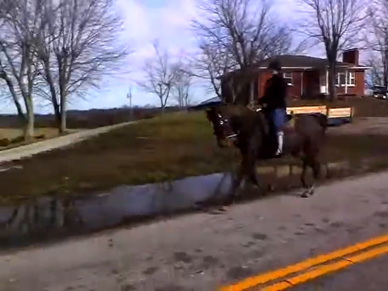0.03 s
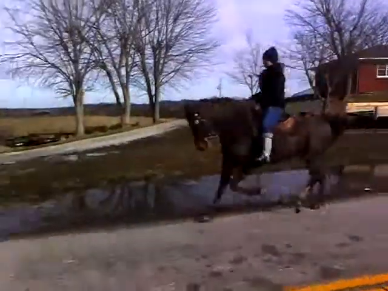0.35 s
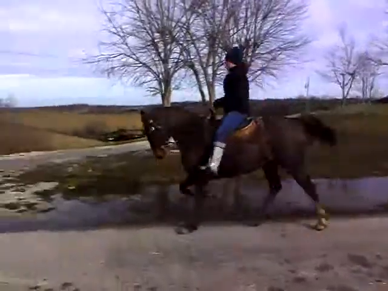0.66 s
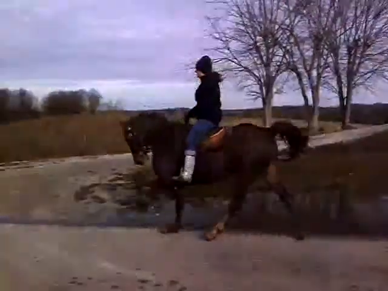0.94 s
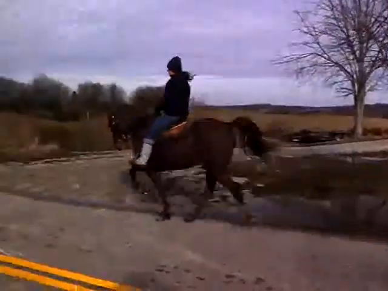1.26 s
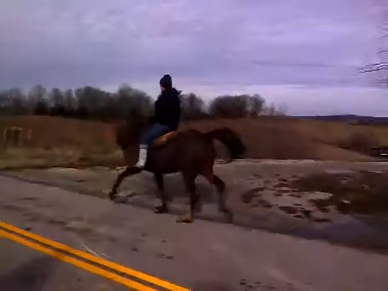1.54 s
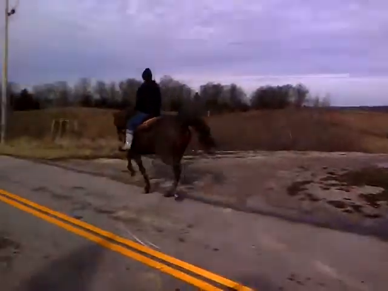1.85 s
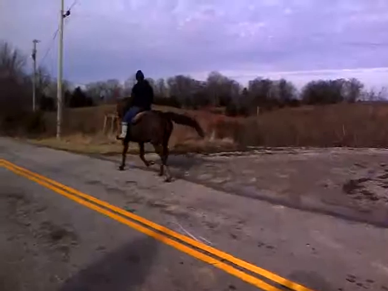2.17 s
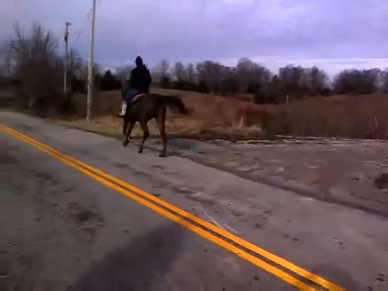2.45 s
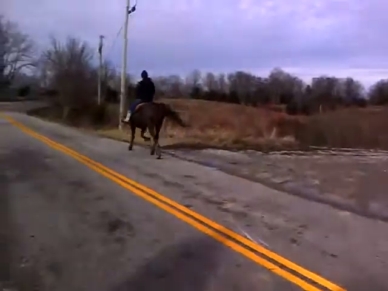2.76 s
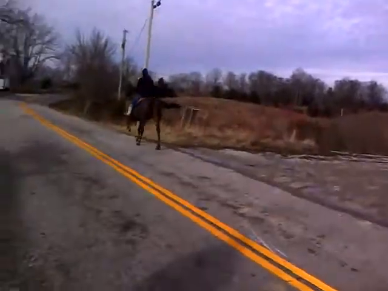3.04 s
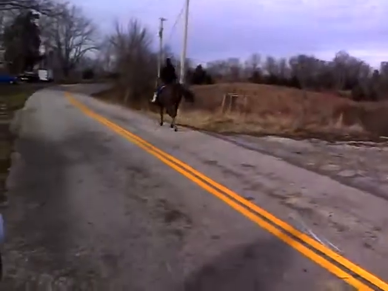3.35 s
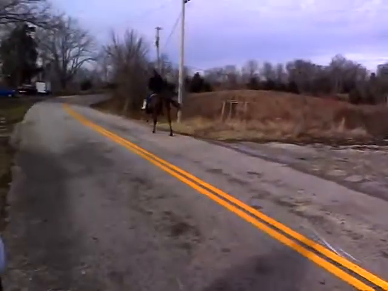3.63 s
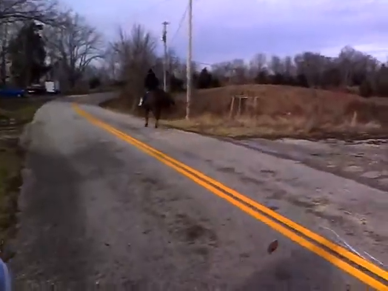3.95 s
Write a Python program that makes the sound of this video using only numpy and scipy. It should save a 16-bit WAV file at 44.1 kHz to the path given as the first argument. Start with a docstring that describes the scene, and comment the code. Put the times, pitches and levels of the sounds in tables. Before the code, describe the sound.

Quick, hollow hoofbeats of a shod horse on pavement, under rumbling gusts of wind.

```python
"""Quick, hollow clip-clops pass close by and move away, under rumbling gusts of wind.
They come from a shod horse on a paved road: each hoof rings with a clop, its steel shoe
clinks, the pavement gives a sharp crack and grit crunches underfoot.
Swirls of air (eddies) buffet the microphone and overload it. A faint hiss lies behind it all."""
import sys
import numpy as np
from scipy import signal
from scipy.fft import rfft, irfft
from scipy.io import wavfile
from scipy.ndimage import map_coordinates

SR = 44100
rng = np.random.default_rng(int(sys.argv[2]) if len(sys.argv) > 2 else 0)


def bounce(signal):
    """Save signal as a 16-bit WAV file at the path given by the first command-line argument."""
    frames = np.transpose(np.atleast_2d(signal))
    limited = np.clip(frames, -1, 1)
    pcm = np.round(limited * 32767).astype(np.int16)
    wavfile.write(sys.argv[1], SR, pcm)


N = 176400
T = np.arange(N) / SR
HIT_T = np.arange(SR // 5) / SR  # seconds since a hit


def from_db(db):
    """Turn decibels into a number to multiply by."""
    return 10 ** (np.asarray(db) / 20)


def unit_power(x):
    """Scale a signal to an average power of 1."""
    return x / np.sqrt(np.mean(x ** 2) + 1e-20)


def coloured(x, spectrum):
    """Shape a signal's tone with (frequency [Hz], level [dB]) points; the result has power 1."""
    hz, db = np.transpose(spectrum)
    bin_hz = np.maximum(np.arange(N // 2 + 1) * SR / N, 1)
    gain = from_db(np.interp(np.log(bin_hz), np.log(hz), db))
    return unit_power(irfft(rfft(x) * gain, N))


def noise(spectrum):
    """Steady noise with the given tone."""
    return coloured(rng.standard_normal(N), spectrum)


def drift(hz):
    """A smooth random wobble, about 1 in size; a higher hz wobbles faster."""
    r = np.exp(-2 * np.pi * hz / SR)
    return unit_power(signal.lfilter([1], [1, -2 * r, r * r], rng.standard_normal(N + SR))[SR:])


def add(out, start_s, sound):
    """Mix a short sound in at the given time."""
    i = max(int(start_s * SR), 0)
    out[i:i + len(sound)] += sound[:max(N - i, 0)]


def hiss():
    """A faint, steady background: a low murmur with a thin hiss on top."""
    # background tone: (frequency [Hz], level [dB])
    tone = [(200, 37.5), (1000, -11), (2000, -30), (3500, 1), (5500, 8), (7600, 22.5), (8600, 9),
            (9800, -5.5), (16000, -18)]
    return from_db(-49) * noise(tone)


def ticks(strength_db):
    """Tiny eddies tap the microphone in little puffs, harder as the wind rises, up to a limit."""
    # tone of a tap: (frequency [Hz], level [dB])
    tone = [(100, -14), (350, -2), (700, 0), (1200, -6), (2000, -20), (3200, -38), (8000, -70)]
    sizes = from_db(9.5 * np.clip(rng.standard_normal(N), -2, 2)) * rng.choice([-1, 1], N)
    taps_per_s = 97 * from_db(5.5 * drift(hz=30))
    taps = coloured(sizes * (rng.random(N) < taps_per_s / SR), tone)
    return taps * from_db(-4 + 1.424 * np.minimum(strength_db, -10.5))


def wind():
    """A lumpy rumble, taps, and eddies that sound louder and higher when the air swirls faster."""
    # wind at the microphone: (time [s], strength [dB])
    gusts = [(0, -8.5), (.1, -6), (.32, -1), (.39, -8), (.46, -3), (.51, -11.5), (.56, -4), (.61, -13),
             (.65, -21), (.69, -29), (.75, -27.5), (.79, -40.5), (.84, -13), (.93, -9.5), (.96, -14),
             (1.03, -4), (1.13, -3), (1.16, -26), (1.205, -25.5), (1.24, -7.5), (1.275, -19), (1.33, -30.5),
             (1.37, -9), (1.41, -26), (1.45, -23), (1.52, -27), (1.62, -27), (1.72, -20.5), (1.79, -26.5),
             (1.86, -25.5), (1.93, -21), (2.03, -25.5), (2.16, -23.5), (2.27, -21), (2.35, -19.5),
             (2.41, -13), (2.475, -27.5), (2.56, -14.5), (2.635, -3.5), (2.70, -3), (2.755, -25),
             (2.83, -18), (2.87, -34), (2.94, -26), (3.01, -29), (3.1, -30.5), (3.17, -20), (3.2, -33),
             (3.23, -20), (3.31, -22.5), (3.40, -18), (3.45, -25), (3.55, -23), (3.6, -28.5), (3.68, -25),
             (3.78, -23.5), (3.83, -32.5), (3.87, -23.5), (3.9, -35.5), (3.94, -24), (4, -24)]
    # tone of the rumble: (frequency [Hz], level [dB])
    rumble_tone = [(20, -14.5), (40, -14.5), (100, -0.5), (170, 1), (330, -2), (600, -11.5), (1000, -48),
                   (1600, -39.5), (3000, -55.5), (8000, -81)]
    # tone of the eddies in a full gust: (frequency [Hz], level [dB])
    flutter_tone = [(60, -31), (150, -12.5), (300, 0), (520, -1.5), (850, -6), (1250, -9), (2000, -17.5),
                    (3500, -29.5), (8000, -54)]
    strength_db = np.interp(T, *np.transpose(gusts)) + 1.82 * drift(hz=65.4)
    swirl = 2 * np.tanh(drift(hz=200) / 2)
    speed = from_db(0.13 * strength_db + 2.5 * swirl)
    # running through the noise faster raises its pitch
    eddies = map_coordinates(noise(flutter_tone), [np.cumsum(speed)], order=3, mode="wrap")
    flutter = from_db(-3.5 + 1.1 * strength_db + 4.5 * swirl) * eddies
    rumble = from_db(-7.5 + 0.74 * strength_db) * noise(rumble_tone)
    return rumble + flutter + ticks(strength_db)


def buffets():
    """Single eddies slap the microphone with brief, ragged pressure swings; small ones swing faster."""
    # slaps of air: (time [s], level [dB], half length [s], centre pitch [Hz])
    slaps = [(0.639, -5, 0.00094, 670), (0.662, -3, 0.0032, 164), (0.668, -5, 0.0019, 700),
             (0.72, 2, 0.0016, 440), (.741, -7, 0.0035, 590), (0.816, -13, 0.0011, 686),
             (0.889, -2.5, 0.002, 592), (0.971, -2.5, 0.0015, 616), (1.178, 10, 0.00067, 600),
             (1.186, 8, 0.0017, 655), (1.239, 6, 0.0014, 450), (1.256, 5, 0.0017, 558),
             (1.286, -6.5, 0.0029, 378), (1.303, -4, 0.0043, 326), (1.368, 4, 0.0012, 550),
             (1.377, 8.5, 0.0013, 594), (1.392, 10, 0.00069, 446), (1.4396, 7.5, 0.00071, 545),
             (1.479, -1.5, 0.0023, 203), (2.253, -13, 0.001, 1040), (2.265, -6.5, 0.0015, 580),
             (2.375, -2.5, 0.00063, 695), (2.4, 13, 0.001, 463), (2.422, 1, 0.00055, 620),
             (2.508, 0, 0.001, 736), (2.553, 3.5, 0.002, 466), (2.573, 0.5, 0.00068, 630),
             (2.592, 5, 0.00067, 590), (2.734, 2, 0.002, 530), (2.774, -3, 0.0011, 610),
             (2.803, -2.5, 0.0019, 455), (2.827, -2.5, 0.0015, 420), (3.059, -6, 0.00088, 656),
             (3.223, -14.5, 0.0015, 485), (3.35, -6, 0.0015, 434), (3.416, -9, 0.0015, 480)]
    # tone of a slap centred on centre_hz: (frequency [Hz], level [dB])
    tone = [(60, -9.5), (200, 2), (500, 0), (900, -2), (1500, -15), (3000, -28.5), (8000, -51)]
    centre_hz, evenness = 500, 0.73
    swings = signal.hilbert(noise(tone))  # its abs() is the size of the swings
    ragged = unit_power(swings.real / (np.abs(swings) + 0.076) ** evenness) / np.sqrt(2)
    out = np.zeros(N)
    t = HIT_T[:SR // 20] - 1 / 40  # seconds from the middle of a slap
    for time_s, db, half_s, hz in slaps:
        pressure = np.interp(time_s + t * hz / centre_hz, T, ragged)
        swell = np.exp(-0.5 * (t / half_s) ** 2)
        add(out, time_s + t[0], from_db(db) * swell * pressure)
    return out


def roadside_echo(sound):
    """The road and its edges scatter back a faint, short echo."""
    echo_db, fade_s, rise_s = -25, 0.32, 0.01
    t = T[:SR // 2]
    tail = rng.standard_normal(len(t)) * from_db(-60 * t / fade_s) * (1 - np.exp(-t / rise_s))
    return from_db(echo_db) * signal.fftconvolve(sound, tail / np.linalg.norm(tail))[:N]


def ring(hz, fade_s):
    """One tone of a struck object, dying away by 60 dB in fade_s."""
    return np.sin(2 * np.pi * hz * HIT_T) * from_db(-60 * HIT_T / fade_s)


def onset(rise_s):
    """A quick rise from 0 to 1 that softens the start of a hit."""
    return 1 - np.exp(-HIT_T / rise_s)


def shoe_rub(hz):
    """Grit rubs the steel shoe and keeps it singing: noise narrowed to a restless ring."""
    width_hz = 330
    r = np.exp(-np.pi * width_hz / SR)
    feedback = [1, -2 * r * np.cos(2 * np.pi * hz / SR), r * r]
    return unit_power(signal.lfilter([1, 0, -1], feedback, rng.standard_normal(len(HIT_T))))


def hooves():
    """Each step rings the hoof and its shoe, cracks on the pavement and grinds some grit."""
    # toe taps and full landings: (time [s], clop level [dB], clop pitch [Hz], clink level [dB],
    # clink pitch [Hz], crack level [dB], grit level [dB], grit fade [s])
    steps = [(0.018, -6, 930, -7, 8220, -17, -28.5, 0.014), (0.198, -10, 980, -5, 6920, -13, -27.5, 0.018),
             (0.411, -18, 1010, -17.5, 6910, -29, -25, 0.022),
             (.537, -30, 980, -22, 5860, -27, -25, 0.0085), (.693, -36, 990, -19, 5260, -17, -23, 0.0068),
             (0.7021, -15, 1040, -1.5, 7890, -12.5, -23.5, 0.0091),
             (0.741, -30, 990, -25, 7300, -38, -38, .014),
             (0.8271, -6.5, 1040, -10.5, 5060, -19, -24.5, 0.0062),
             (0.924, 2.5, 942, -26, 7100, -16.5, -27.5, 0.015),
             (1.072, -25, 990, -1.5, 5980, -18, -17, 0.004),
             (1.214, -3, 1024, -21, 5170, -16, -33.5, 0.011),
             (1.223, -17, 1030, -8.5, 8000, -14, -32, .014),
             (1.3563, -5, 983, -16, 5300, -9.5, -28.5, 0.019),
             (1.437, -35, 985, -28, 5560, -30, -21, 0.0056),
             (1.448, -6.5, 1053, -15.5, 7450, -10, -18, 0.0066),
             (1.56, -42.5, 1010, -27.5, 5600, -33, -38, 0.004),
             (1.5883, -33, 980, -15.5, 4700, -24, -38.5, 0.004),
             (1.5924, -3.5, 980, -16, 6580, -17, -39.5, 0.031),
             (1.723, -19, 990, -26.5, 5300, -45.5, -32, 0.0068),
             (1.734, -17, 975, -29, 7600, -21, -36, 0.026), (1.895, -9, 954, -5, 5400, -20, -23, 0.0042),
             (1.898, -8, 1070, -20, 8400, -14.5, -33.5, 0.02),
             (1.915, -28, 990, -14, 9030, -34, -36, 0.0086),
             (1.9744, -14.5, 1055, -24, 7700, -24.5, -27, 0.005),
             (1.9864, -4.5, 996, -13, 5600, -15.5, -22.5, 0.0098),
             (2.105, -35, 1000, -12.5, 5630, -27.5, -26, 0.004),
             (2.1409, -15, 1026, -7, 7370, -20, -31, 0.0039),
             (2.143, -7.5, 965, -12, 7560, -46, -41, 0.019),
             (2.272, -35, 1000, -15, 6600, -35, -44, 0.0044),
             (2.278, -14, 1050, -16, 5340, -40, -24, 0.0088),
             (2.433, -6.5, 1020, 6.5, 7160, -14, -26, 0.014),
             (2.522, -11.5, 1000, -14.5, 5500, -32, -30, 0.0054),
             (2.533, -7.5, 1005, -3.5, 7100, -24, -23, 0.0077),
             (2.813, -37, 980, -25, 7100, -41, -31.5, 0.008),
             (2.8248, -5, 997, 1, 6960, -31, -20.5, 0.0055), (2.9812, -7.5, 947, 4, 7220, -15.5, -45, 0.06),
             (3.076, -36, 960, -21, 5500, -36, -41, 0.012), (3.088, -8, 1013, -6, 6930, -51, -32.5, 0.013),
             (3.195, -45, 980, -28, 7060, -32, -36, 0.0045),
             (3.233, -8.5, 1007, -9.5, 7420, -20.5, -42, 0.0073),
             (3.253, -14.5, 1030, -12, 7730, -34, -35, 0.016),
             (3.308, -42, 1000, -14.5, 6600, -48, -32, 0.0064),
             (3.359, -22.5, 1000, -15.5, 6880, -34, -28, 0.0058),
             (3.37, -21, 1040, -15.5, 7200, -34.5, -31, 0.0086),
             (3.535, -9.5, 1050, -9.5, 5260, -19, -38, 0.024),
             (3.583, -23.5, 950, -23.5, 6900, -41, -30.5, 0.012),
             (3.621, -40, 990, -23, 6900, -40, -38, 0.011), (3.637, -12, 960, -20, 6650, -24, -35, 0.008),
             (3.745, -34, 970, -29.5, 6100, -33, -49.5, 0.0055),
             (3.793, -31.5, 975, -36.5, 4760, -33, -56, 0.0045),
             (3.8083, -11.5, 980, -15, 5200, -18, -38, .008),
             (3.829, -34, 1030, -18, 6900, -33, -29, 0.0071),
             (3.835, -24, 1010, -8, 6600, -33, -37, 0.0088),
             (3.871, -43, 1010, -35.5, 6530, -47, -31.5, 0.011),
             (3.925, -16.5, 930, -16.5, 6770, -25, -35.5, 0.013)]
    # tones of the hollow hoof: (multiple of the clop pitch, level [dB], time to fade 60 dB [s])
    hoof_tones = [(0.942, 0.5, 0.029), (1.088, -5, 0.034), (2.15, -7, 0.017), (2.42, -16.5, 0.034),
                  (3.25, -17, 0.015)]
    # tones of the steel shoe: (multiple of the clink pitch, level [dB], time to fade 60 dB [s])
    shoe_tones = [(.64, -11, 0.0056), (0.778, -10.5, 0.011), (0.952, 1.5, 0.006), (0.998, -3.5, 0.015),
                  (1.092, -8.5, 0.011)]
    # tone of the crack on the pavement: (frequency [Hz], level [dB])
    crack_tone = [(300, -48), (1000, 20), (1600, 6), (2350, -2), (3200, 7.5), (4000, -1.5), (5400, 5),
                  (8000, -10), (9800, -12), (16000, -27)]
    # tone of the crunching grit: (frequency [Hz], level [dB])
    grit_tone = [(500, 9), (1050, 9.5), (1600, -2.5), (2300, 1.5), (3600, -14.5), (5400, 5.5), (7300, 6),
                 (8300, 1.5), (9800, -21.5), (16000, -21)]
    ringing, crack_gain, grit_gain = np.zeros((3, N))
    variations_db = 3.5 * rng.standard_normal((len(steps), len(shoe_tones)))  # no two clinks alike
    for step, extras_db in zip(steps, variations_db):
        time_s, clop_db, clop_hz, clink_db, clink_hz, crack_db, grit_db, grit_fade_s = step
        clop = sum(from_db(db) * ring(clop_hz * ratio, fade_s) for ratio, db, fade_s in hoof_tones)
        clink = sum(from_db(db + extra_db) * ring(clink_hz * ratio, fade_s)
                    for (ratio, db, fade_s), extra_db in zip(shoe_tones, extras_db))
        add(ringing, time_s, from_db(clop_db) * clop * onset(rise_s=0.0012))
        add(ringing, time_s, from_db(clink_db) * clink * onset(rise_s=0.0014))
        add(crack_gain, time_s, from_db(crack_db) * np.exp(-HIT_T / 0.0038))
        slide = from_db(grit_db) * np.exp(-HIT_T / grit_fade_s) * onset(rise_s=0.0015)
        add(grit_gain, time_s, from_db(4.5) * slide)
        add(ringing, time_s, from_db(-2.5) * slide * shoe_rub(clink_hz))
    grains = rng.standard_normal(N) * from_db(6 * drift(hz=750))  # a fast flicker makes it rough
    return ringing + crack_gain * noise(crack_tone) + grit_gain * coloured(grains, grit_tone)


def scene():
    """The horse, its echo, the wind and the hiss, mixed into one channel."""
    horse = hooves()
    return (horse + roadside_echo(horse) + wind() + buffets() + hiss())[None]


def record(dry):
    """The microphone dulls the treble, overload flattens loud peaks, and the highest treble is cut."""
    dull_hz, ceiling, hardness, cutoff_hz = 9230, 0.72, 16, 16000
    dull = signal.sosfilt(signal.butter(2, dull_hz, fs=SR, output="sos"), dry)
    clipped = dull / (1 + np.abs(dull / ceiling) ** hardness) ** (1 / hardness)
    return signal.sosfilt(signal.ellip(10, 0.1, 80, cutoff_hz, fs=SR, output="sos"), clipped)


dry = scene()
out = record(dry)
bounce(out)
```